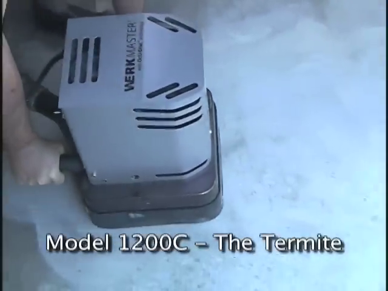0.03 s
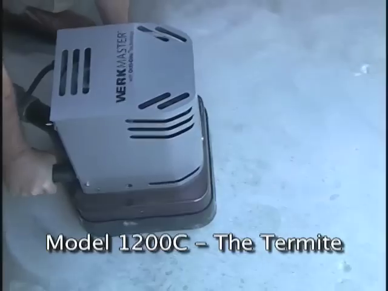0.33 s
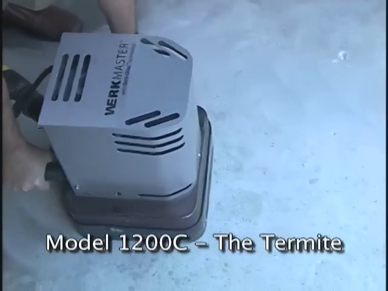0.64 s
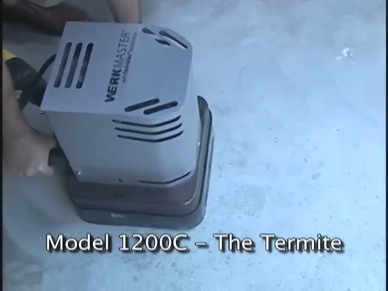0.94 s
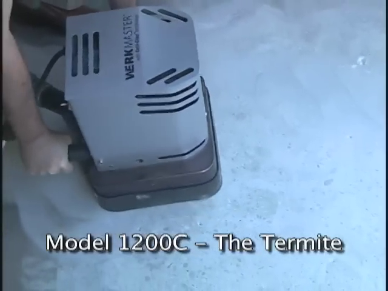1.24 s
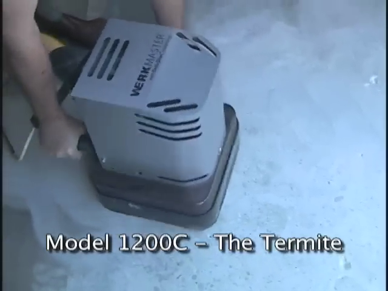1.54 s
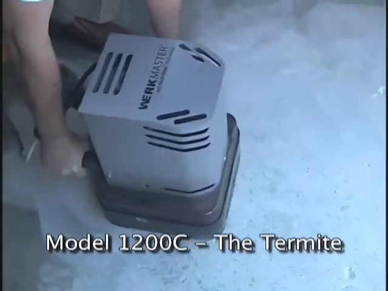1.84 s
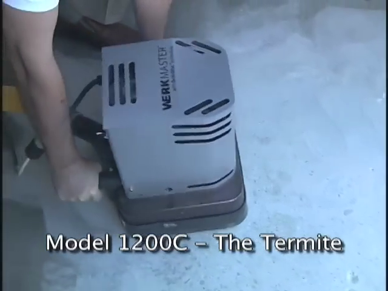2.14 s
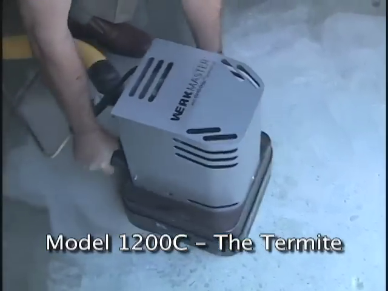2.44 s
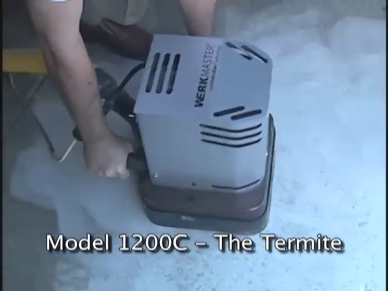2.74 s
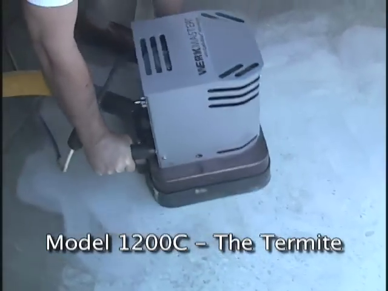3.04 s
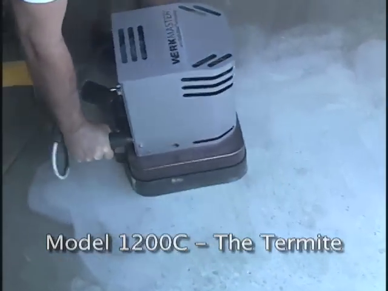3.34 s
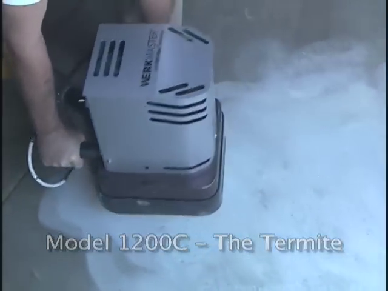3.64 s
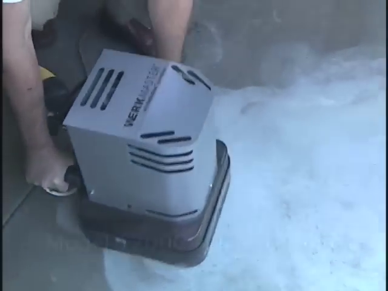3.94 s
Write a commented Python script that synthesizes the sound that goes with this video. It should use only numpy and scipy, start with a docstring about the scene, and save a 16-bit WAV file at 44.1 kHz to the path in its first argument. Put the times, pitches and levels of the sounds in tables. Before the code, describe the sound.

A floor grinder works concrete for the whole four seconds, close indoors with little echo. Its gritty roar and hissing scrape flutter slightly, while the housing's ring swells and fades as the machine swings, with small chirps scattered throughout. The tools catch with short, rough squeaks four times between 0.5 and 0.8 seconds, then three more times around 2 seconds. The grinding continues steadily to the end.

```python
"""A floor grinder on concrete, indoors, on two spaced microphones; it sounds close, with little room.
From the start, grit under the spinning tools roars, scrapes and rings the housing, fluttering once
a turn over a faint motor hum. The ringing swells and fades as the machine is swung about, and now
and then a tool sticks and chirps. From half a second in, a tool catches hard four times, then three
times more around two seconds; the grinding carries on to the end."""
import sys
import numpy as np
from scipy import signal
from scipy.fft import rfft, irfft
from scipy.io import wavfile
from scipy.ndimage import map_coordinates

SR = 44100
rng = np.random.default_rng(int(sys.argv[2]) if len(sys.argv) > 2 else 0)


def pcm_store(signal):
    """Save signal as 16-bit PCM."""
    levels = np.round(np.clip(np.atleast_2d(signal), -1, 1) * 32767)
    wavfile.write(sys.argv[1], SR, levels.astype(np.int16).T)


N = 4 * SR
TIME, FREQ = np.arange(N) / SR, np.fft.rfftfreq(N, 1 / SR)


def amp(db):
    """Decibels to gain."""
    return 10 ** (np.asarray(db) / 20)


def unit_rms(x):
    """Scales to rms 1."""
    return x / np.sqrt(np.mean(x ** 2) + 1e-20)


def spectrum(table):
    """Each column of a table, interpolated over log frequency."""
    hz, *columns = np.transpose(table)
    return np.array([np.interp(np.log(FREQ + 1), np.log(hz + 1), c) for c in columns])


def swell(curve):
    """A level curve in dB about its mean power, shared or one for each microphone."""
    times, *columns = np.transpose(curve)
    db = np.array([np.interp(TIME, times, c) for c in columns])
    return db - 10 * np.log10(np.mean(amp(db) ** 2, axis=1, keepdims=True))


def drift(rate_hz):
    """A random wander of rms 1, mostly slower than rate_hz."""
    noise = rfft(rng.standard_normal(N)) * (FREQ > 0)
    return unit_rms(irfft(noise / (1 + (FREQ / rate_hz) ** 4), N))


def grit(response, hits_per_s=22000, spread_db=2, lag_s=0.003717, phase_rad=0.89):
    """Dense grit impacts through a response; the direct sound reaches the right microphone later."""
    # likeness of the two microphones: (frequency [Hz], coherence [0-1])
    coherence = [(30, .6), (130, 0.6), (300, 0.74), (470, 1), (590, 0), (680, 0.48), (800, 0.81), (980, 0),
                 (1230, 0.22), (1500, 0), (2060, 0.43), (3000, 0.06)]
    hits = (rng.random((2, N)) < hits_per_s / SR) * rng.choice([-1, 1], (2, N))
    strength = amp(spread_db * rng.standard_normal((2, N)))
    direct, diffuse = rfft(unit_rms(hits * strength))
    shared = spectrum(coherence)[0]
    delay = np.exp(-1j * (2 * np.pi * FREQ * lag_s + phase_rad))
    right = shared * direct * delay + np.sqrt(1 - shared ** 2) * diffuse
    return irfft(np.array([direct, right]) * response, N)


def grinding(response, level, turn, flutter_db, chatter_db):
    """Grit whose bite follows a level curve, varies once a turn and chatters at random."""
    return grit(response) * amp(swell(level) + flutter_db * turn + chatter_db * drift(rate_hz=46))


def concrete(turn):
    """The rumble and broad roar of the abrasion, its bright scrape and the fizz of fine dust."""
    # spectra at the microphones: (frequency [Hz], left [dB], right [dB])
    rumble = [(20, -56, -58), (45, -52, -56), (80, -42.5, -48), (110, -32.5, -41), (146, -28.5, -29),
              (210, -22, -27.5), (256, -24, -28), (333, -21.5, -23), (362, -13, -19.5), (606, -21, -20.5),
              (1210, -19.5, -65), (4000, -90, -80)]
    roar = [(100, -55, -40), (400, -54, -36.5), (670, -12.5, -9), (1070, -24, -41), (1490, -27, -17.5),
            (1760, -21.5, -23.5), (2400, -23.5, -18), (2820, -35.5, -30.5), (4150, -30, -15.5),
            (8000, -33, -46), (16000, -65, -70)]
    scrape = [(300, -80, -80), (1500, -42, -62), (2480, -22, -17.5), (2910, -19.5, -20), (3400, -16, -15.5),
              (4150, -12.5, -10), (4500, -14.5, -12), (5220, -13.5, -12.5), (6000, -16.5, -14.5),
              (6800, -17.5, -20), (8530, -27, -23.5), (11000, -44, -39), (16000, -60, -65)]
    fizz = [(1000, -80, -80), (4000, -54, -48), (7240, -30, -25), (8700, -20.5, -40), (9630, -16.5, -39),
            (11320, -22, -38), (12450, -28, -44), (13800, -32, -38), (15000, -34, -42), (15800, -41, -58)]
    # swells on both microphones: (time [s], level [dB])
    rumble_level = [(0, -2), (.7, -2.5), (3.1, -0.5), (4, -2)]
    roar_level = [(0, 2), (.3, 3), (.48, -2), (.75, -1), (1.0, 2.5), (1.36, 3.8), (1.8, 1.8), (2.1, 0),
                  (2.5, 3.3), (2.9, 1), (3.15, -1), (4, -1)]
    fizz_level = [(0.0, 4.5), (0.4, 5.5), (0.5, 6), (0.8, 6.5), (1.4, 4.4), (1.6, 7), (1.9, 6), (2.3, 8.5),
                  (2.4, 5), (2.8, 7), (3.4, 4), (3.5, 3.5), (3.6, 4.5), (3.7, 5), (3.8, 6.5), (4.0, 4)]
    # swell on each microphone: (time [s], left [dB], right [dB])
    scrape_level = [(0, 3, 4), (.4, 3, 3.5), (1, -0.5, 2), (.75, 2, 1.3), (1.06, 1, 2.5), (1.2, 2.8, 4.4),
                    (2.0, 3, 2.5), (2.18, 1.5, 1), (2.45, 1.5, 2.8), (2.8, 2, 2.6), (3.04, 2.7, 3.5),
                    (3.46, 1.5, 2.5), (3.66, 3.8, 4.5), (4, 3, 4)]
    return (grit(amp(spectrum(rumble))) * amp(swell(rumble_level))
            + grit(amp(spectrum(roar))) * amp(swell(roar_level))
            + grinding(amp(spectrum(scrape)), scrape_level, turn, flutter_db=0.27, chatter_db=0.82)
            + grinding(amp(spectrum(fizz)), fizz_level, turn, flutter_db=0.3, chatter_db=0.7))


def ringing(modes):
    """Left and right response of a group of damped modes, which radiate little bass."""
    power = 0
    for hz, width, left, right in modes:
        radiation = np.minimum(2 * FREQ / hz, 1) ** 2
        falloff = 1 + (np.sqrt(2) - 1) * (2 * (FREQ - hz) / width) ** 2
        power += (amp([[left], [right]]) * radiation / falloff) ** 2
    return np.sqrt(power)


def bent(x, pitch):
    """Slides a resonance up and down by the ratio of a pitch curve to its mean."""
    hz = np.interp(TIME, *np.transpose(pitch))
    position = np.cumsum(hz / hz.mean()) - 1
    return np.array([map_coordinates(side, [position], order=3, mode="nearest") for side in x])


def tools(turn):
    """Grit rings the tools, whose resonances shift with the pressure on the floor."""
    # tool modes: (frequency [Hz], width [Hz], left [dB], right [dB])
    ring_modes = [(1990, 330, -11.5, -54), (2070, 277, -19, -10.5)]
    squeal_modes = [(3650, 580, -14, -15), (3844, 245, -9, -15), (3936, 260, -14, -17.5)]
    # swell of the ring: (time [s], level [dB])
    ring_level = [(0, 0), (.15, 0.5), (.42, 1), (.5, 1.5), (.75, 2.5), (.82, 1), (1.1, 2), (1.2, -.5),
                  (1.48, 0), (1.56, 3), (1.7, 3), (2.15, -.5), (2.68, 4), (3.12, 0.5), (3.3, 0), (3.42, 1),
                  (3.6, -2), (3.7, 0.5), (4, -0.5)]
    # swell of the squeal: (time [s], left [dB], right [dB])
    squeal_level = [(0, -2, -1), (.44, -1, -2), (.61, 0.5, 2), (.85, -1, 1), (1.06, 0.5, 3.5),
                    (1.2, -1.5, -2.5), (1.4, -1.5, -3), (1.7, -1.5, 2.5), (1.86, -2.5, 0), (1.96, -1, -3),
                    (2.56, -1.5, 0.5), (2.72, -0.5, -2), (2.87, -1.5, -3), (3.46, 0.8, 1.5),
                    (3.7, -0.5, -4), (4, 1, -3)]
    # shift under pressure: (time [s], pitch [Hz])
    ring_pitch = [(0, 2050), (.19, 1985), (.41, 2036), (1.06, 2087), (1.361, 2039), (2.001, 1994),
                  (2.15, 2045), (2.78, 2079), (2.92, 2058), (3.77, 2068), (4, 2124)]
    squeal_pitch = [(0, 3926), (.41, 3888), (1.062, 3827), (1.36, 3948), (1.5, 3871), (2.101, 3941),
                    (2.752, 3811), (2.92, 3982), (3.4, 3929), (4, 3875)]
    ring = grinding(ringing(ring_modes), ring_level, turn, flutter_db=0.35, chatter_db=1.5)
    squeal = grinding(ringing(squeal_modes), squeal_level, turn, flutter_db=0, chatter_db=1.2)
    return bent(ring, ring_pitch) + bent(squeal, squeal_pitch)


def housing(turn):
    """Grit rings the housing; each group of modes swells and fades as the machine is swung."""
    # housing modes, grouped by sound: (frequency [Hz], width [Hz], left [dB], right [dB])
    drone = [(437, 92, -12, -17)]
    hoot = [(526, 45, -14, -16.5)]
    howl = [(744, 58, -14.5, -9), (803, 59, -6.5, -13), (863, 47, -11, -5.5)]
    clang = [(965, 120, -17, -16.5), (1135, 137, -18, -13.5)]
    whine = [(1230, 35, -12, -13)]
    # swells on both microphones: (time [s], level [dB])
    drone_level = [(0, 6.5), (.3, 3), (.55, -12), (.75, 4), (.9, 1), (1.2, 2), (2.5, -2), (2.6, 6.5),
                   (2.9, -1), (3.4, 7.5), (3.68, 7), (3.76, 11.5), (4, 0)]
    hoot_level = [(0, 0), (.3, 4.5), (.55, -2.5), (1.25, 9.5), (1.55, 4.5), (1.7, -2), (1.9, 4), (2.05, -1),
                  (2.3, 10.5), (2.4, 1), (2.62, 4), (2.8, 0.5), (3.3, 8), (3.7, -13), (3.92, 4.5)]
    clang_level = [(0, 2), (.3, -1.5), (.5, -4.5), (.75, -4.5), (.97, -2.5), (1.2, -3.5), (1.4, 1.5),
                   (1.6, -1), (1.7, -1), (1.9, -1), (2.2, -1.5), (2.35, -3.5), (2.55, 0), (4, 0)]
    whine_level = [(0.0, -11), (0.2, 8.5), (0.7, -7), (0.9, 8), (1.0, 1), (1.3, 10), (1.5, 5), (1.6, -16),
                   (1.8, -17), (2.0, 10), (2.5, 5), (3.0, 8), (4.0, -9)]
    # swell on each microphone: (time [s], left [dB], right [dB])
    howl_level = [(0, -1.5, -1.5), (.24, 1, 1.5), (.4, -6, -5.5), (.7, -6, -7), (.8, -1, 0.5), (.9, 5.5, 1),
                  (1.01, -0.5, 0), (1.13, 1, 0), (1.21, -6, -5), (1.36, 3, 0.5), (1.52, -4, -3),
                  (1.74, 1.5, 1), (1.82, 2, 4), (1.95, 0.5, 0), (2.03, -6, -6), (2.22, 2, -4),
                  (2.32, -4, -8), (2.43, 5, -1), (2.55, 2, 6), (2.61, -1.5, 3), (2.79, 3, 3),
                  (2.84, -5, -9), (2.95, -1.5, -2), (3.35, -2.5, -3), (3.52, -3, -5), (4, -6, 0.5)]
    return (grinding(ringing(drone), drone_level, turn, flutter_db=0.5, chatter_db=0)
            + grinding(ringing(hoot), hoot_level, turn, flutter_db=2.6, chatter_db=3.2)
            + grinding(ringing(howl), howl_level, turn, flutter_db=-1.8, chatter_db=1.45)
            + grinding(ringing(clang), clang_level, turn, flutter_db=-0.4, chatter_db=1.8)
            + grinding(ringing(whine), whine_level, turn, flutter_db=2, chatter_db=1))


def hollowed(x, centre_hz=624, width_hz=49):
    """A dip between the low resonances deepens and fills as the machine is swung."""
    # share of the band taken out: (time [s], depth [0-1])
    depth = [(0, 0.35), (.8, 0.1), (1.1, 0.7), (1.9, 0.35), (2.2, 0.66), (2.6, 0.65), (2.95, 0.5),
             (3.2, .1), (4, .1)]
    band = irfft(rfft(x) * np.exp(-((FREQ - centre_hz) / width_hz) ** 2), N)
    return x - np.interp(TIME, *np.transpose(depth)) * band


def motor(shaft_hz=56, wander=0.02, left_db=-67, right_db=-75):
    """A faint, unsteady hum at the shaft speed."""
    turns = np.cumsum(shaft_hz * (1 + wander * drift(rate_hz=3.9))) / SR
    hum = np.sin(2 * np.pi * turns) * amp(2.5 * drift(rate_hz=4))
    return amp([[left_db], [right_db]]) * unit_rms(hum)


def chirps(per_s=12, length_s=0.014, centre_hz=3940, spread_hz=160, glide_hz=70, typical_db=-36.5):
    """Now and then a tool sticks and slips, and squeals briefly."""
    t = np.arange(0, length_s, 1 / SR)
    envelope = np.sin(np.pi * t / length_s)
    out = np.zeros((2, N + len(t)))
    for at in rng.integers(N, size=round(per_s * N / SR)):
        pitch, glide, left, right = rng.standard_normal(4)
        hz = centre_hz + spread_hz * pitch + glide_hz * glide * (t / length_s - 0.5)
        squeal = envelope * np.sin(2 * np.pi * np.cumsum(hz) / SR)
        out[:, at:at + len(t)] += np.array([[left], [right]]) * squeal
    return amp(typical_db) * out[:, :N]


def catches(rise_s=0.0051, rough_hz=260):
    """A tool catches hard on the floor: a rough ring swells in a few milliseconds and dies away."""
    # hard catches: (time [s], peak [dB], pitch [Hz], left minus right [dB])
    events = [(.500, -20, 3770, 2), (.612, -17, 3960, .5), (.63, -23, 3990, 0), (.81, -18, 4000, -2.5),
              (1.924, -22, 3800, 4), (2.149, -20, 4000, 1.5), (2.174, -20, 3890, 3)]
    t = np.arange(SR // 20) / SR
    envelope = t / rise_s * np.exp(1 - t / rise_s)
    out = np.zeros((2, N))
    for time_s, db, hz, pan in events:
        rough_pitch = hz + rough_hz * rng.standard_normal((2, len(t)))
        cycles = np.cumsum(rough_pitch, axis=1) / SR + rng.random((2, 1))
        gain = amp([[db + pan / 2], [db - pan / 2]])
        at = round((time_s - rise_s / 2) * SR)
        out[:, at:at + len(t)] += gain * envelope * np.sin(2 * np.pi * cycles)
    return out


def room(x, wet_db=-20, t60_s=0.11):
    """Hard walls send each microphone its own short tail of reflections."""
    t = np.arange(SR // 3) / SR
    tail = rng.standard_normal((2, len(t))) * amp(-60 * t / t60_s)
    tail /= np.linalg.norm(tail, axis=1, keepdims=True)
    reflections = irfft(rfft(x) * rfft(tail, N), N)
    wet = amp(wet_db)
    return (x + wet * reflections) / np.sqrt(1 + wet ** 2)


def scene(turn_hz=26.34, wander=0.015):
    """The grinder in the room; all the flutter follows the same turning tools."""
    speed_hz = turn_hz * (1 + wander * drift(rate_hz=0.44))
    turn = np.sin(2 * np.pi * np.cumsum(speed_hz) / SR)
    grinder = tools(turn) + housing(turn) + concrete(turn) + chirps() + catches()
    return room(hollowed(grinder)) + motor()


def record(dry):
    """The recorder cuts the top treble on both channels."""
    edge_hz = 15700
    low_pass = signal.firwin(801, edge_hz, window=("kaiser", 9), fs=SR)
    return signal.oaconvolve(dry, low_pass[None], "same")


dry = scene()
out = record(dry)
pcm_store(out)
```